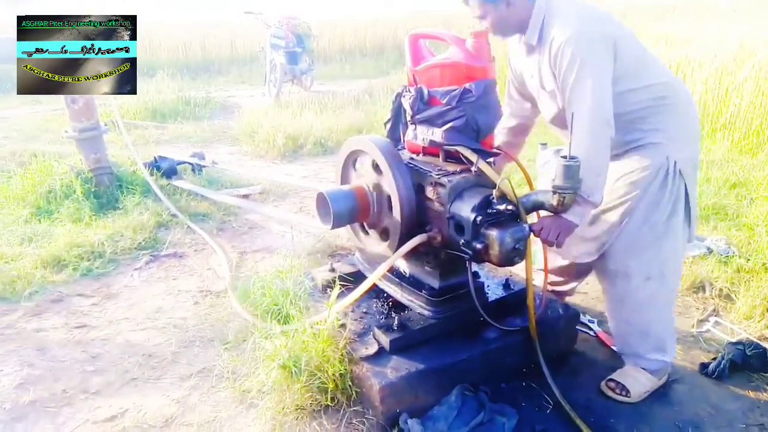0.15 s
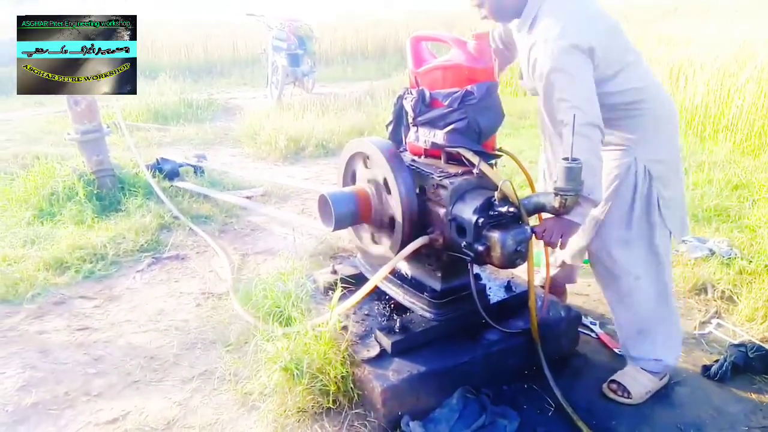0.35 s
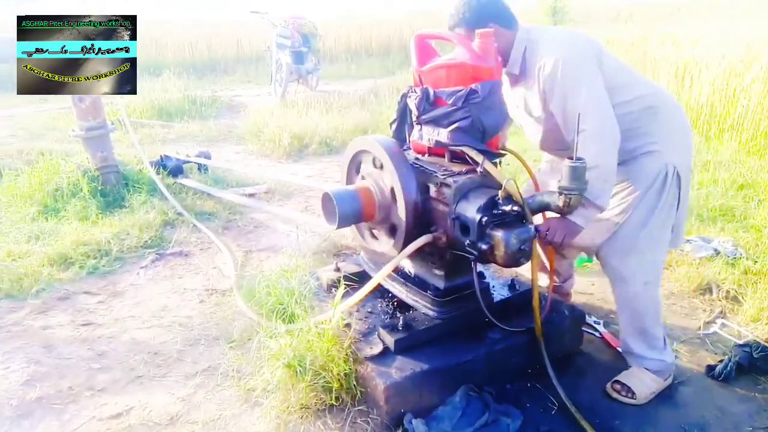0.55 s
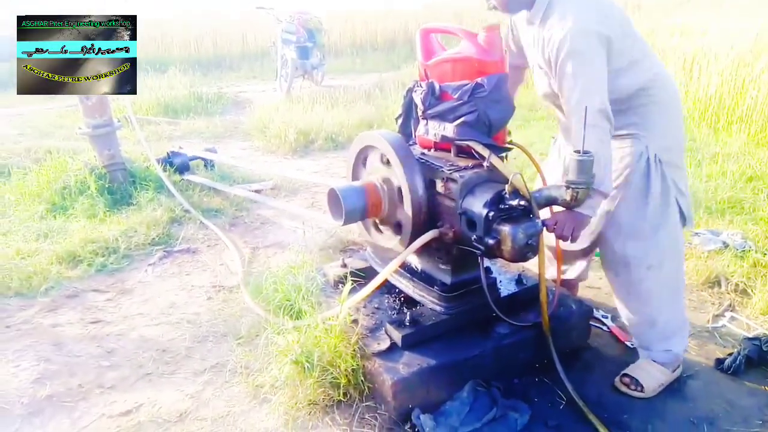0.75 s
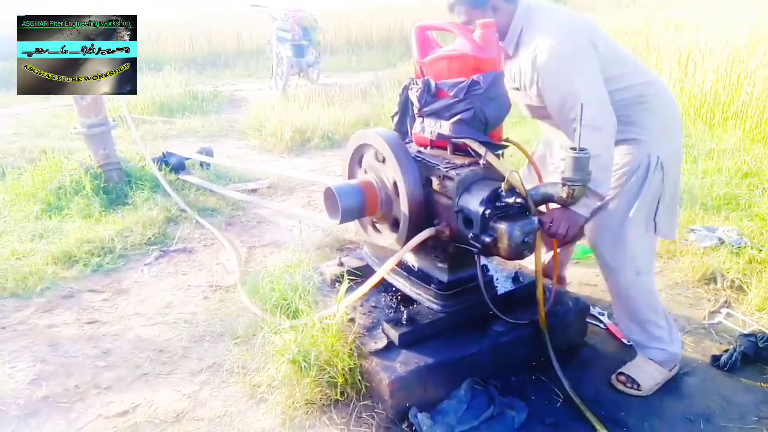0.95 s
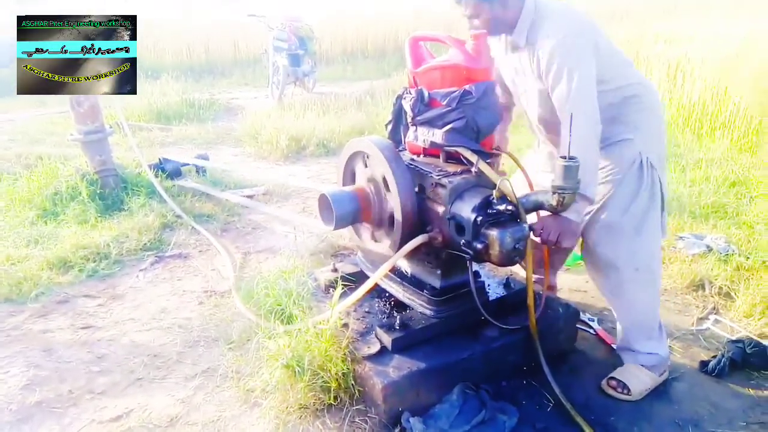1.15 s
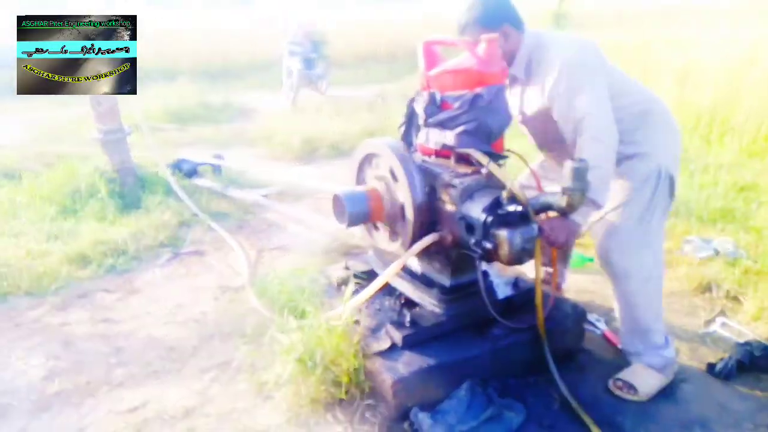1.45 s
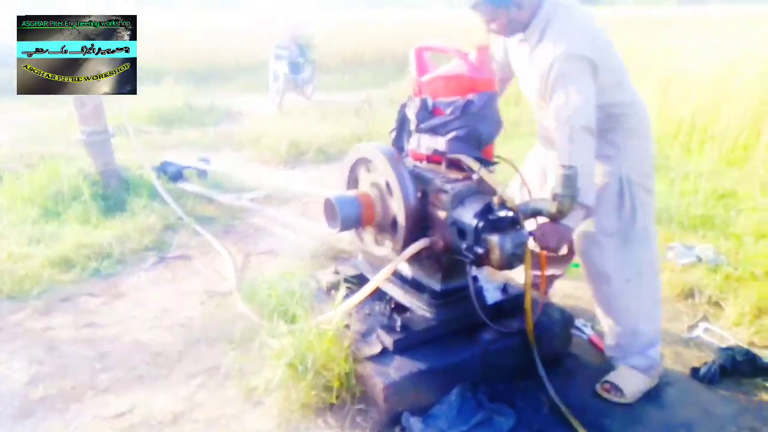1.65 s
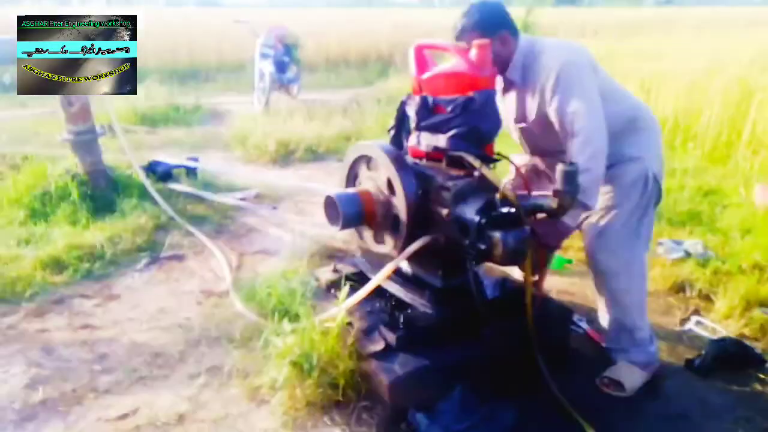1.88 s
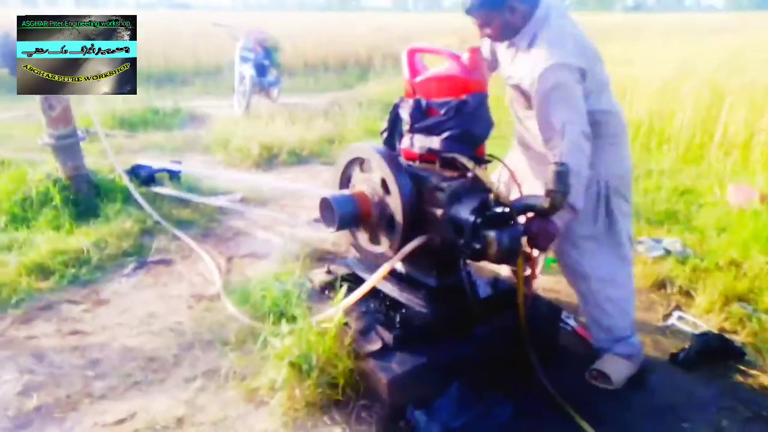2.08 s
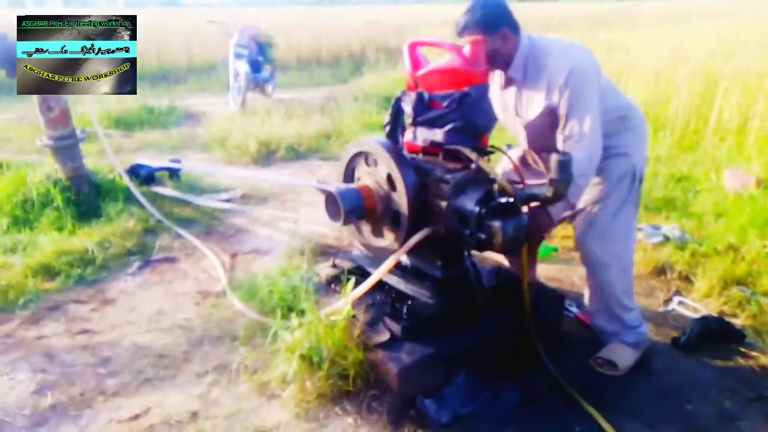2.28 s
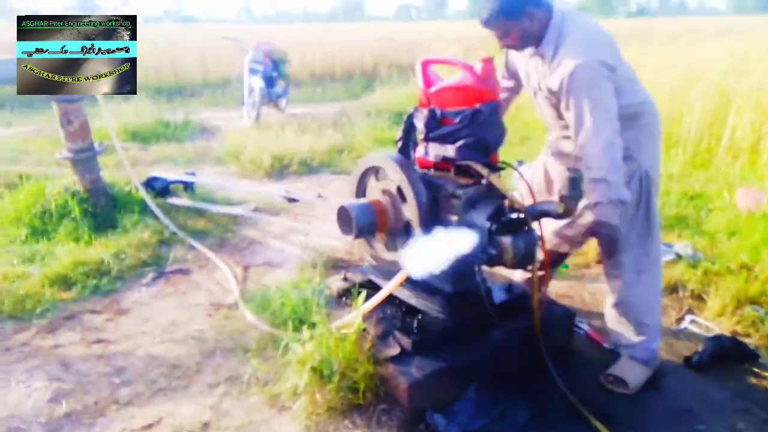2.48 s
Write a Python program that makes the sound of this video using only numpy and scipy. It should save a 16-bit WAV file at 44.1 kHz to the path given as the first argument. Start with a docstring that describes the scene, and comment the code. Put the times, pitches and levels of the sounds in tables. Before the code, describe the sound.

Hand-cranked old diesel engine turns over with gear rumble, breathy puffs, ticks and iron clanks

```python
"""Gear rumble opens the scene: a single-cylinder diesel is hand-cranked outdoors with its valve held open.
Random tooth knocks and sliding noise excite resonances of the cast block and case, beside a wandering hum.
Shaped turbulent noise puffs out of and sucks into the cylinder; a sharp bump and a few soft ones reach the
microphone directly. Tappets tick, the valve rings and linkage clanks as damped modes, and iron scrapes as
grains of friction while the crank stalls. Low outdoor air and a steady floor lie beneath."""
import sys
import numpy as np
from scipy import signal
from scipy.fft import rfft, irfft, next_fast_len
from scipy.io import wavfile
from scipy.ndimage import uniform_filter1d, map_coordinates

SR = 44100
rng = np.random.default_rng(int(sys.argv[2]) if len(sys.argv) > 2 else 0)


def to_wav(s):
    """Save 16-bit WAV."""
    ch = np.atleast_2d(s).T  # columns
    pcm = np.round(np.clip(ch, -1, 1) * 32767)  # PCM
    wavfile.write(sys.argv[1], SR, pcm.astype(np.int16))


N = 116865
T = np.arange(N) / SR  # time [s]


def amp(db):
    """Decibel law: a level in dB becomes an amplitude ratio."""
    return 10 ** (np.asarray(db) / 20)


def unit(x):
    """Power normalization: x is scaled to rms 1."""
    return x / np.sqrt(np.mean(x ** 2) + 1e-20)


def filtered(x, response):
    """Linear filtering: the spectrum of x is multiplied by a complex response of frequency."""
    m = next_fast_len(N + SR // 2)
    return irfft(rfft(x, m) * response(np.fft.rfftfreq(m, 1 / SR)), m)[:N]


def dull(hz):
    """Causal low-pass: four equal first-order poles at hz in cascade."""
    return lambda f: (1 + 1j * f / hz) ** -4


def resonate(x, peaks, top_hz):
    """Modal superposition: parallel (Hz, width Hz, dB) resonances fade above top_hz; the sum has rms 1."""
    def response(f):
        modes = 0
        for k, (centre, width, db) in enumerate(peaks):
            damping = 1j * f * width
            # neighbouring modes alternate in sign
            modes = modes + (-1) ** k * amp(db) * damping / (centre ** 2 - f ** 2 + damping)
        low_cut = (1j * f / (70 + 1j * f)) ** 2
        return dull(top_hz)(f) * low_cut * modes
    return unit(filtered(x, response))


def noise(points):
    """Spectral shaping: white noise is coloured by (Hz, dB) points on a log-frequency axis, to rms 1."""
    hz, db = np.transpose(points)

    def colour(f):
        return amp(np.interp(np.log(f + 1), np.log(hz + 1), db))
    return unit(filtered(rng.standard_normal(N), colour))


def wobble(rate):
    """Slow random modulation: a smooth curve through random knots, rate of them a second."""
    knots = rng.standard_normal(int(N * rate / SR) + 4)
    return map_coordinates(knots, [T * rate])


def patchy(x, depth_db, count=6):
    """Time-frequency modulation: smoothed random gain patches make the noise uneven, at rms 1."""
    z = signal.stft(x, nperseg=256)[2]
    field = uniform_filter1d(rng.standard_normal(z.shape), size=4, axis=0)  # along frequency
    field = uniform_filter1d(field, size=count, axis=1)  # along time
    return unit(signal.istft(z * amp(depth_db * unit(field)), nperseg=256)[1][:N])


def swell(rows):
    """Asymmetric Gaussian envelopes: each flow (peak s, dB, rise s, fall s) grows and dies at its own rate."""
    total = 0
    for s, db, rise, fall in rows:
        width = np.where(T < s, rise, fall)
        total = total + amp(db) * np.exp(-((T - s) / width) ** 2)
    return total


def ring(modes, rise_s, rattle):
    """Impulse response: modes (Hz, dB, t60 s), scattered in level and pitch, decay under a rough gain."""
    scatter_db, detune = 3, 0.023
    t = T[:SR // 4]
    tone = 0
    for hz, db, t60 in modes:
        decay = amp(db + scatter_db * rng.normal() - 60 * t / t60)
        tone = tone + decay * np.sin(2 * np.pi * hz * (1 + detune * rng.normal()) * t)
    jiggle = 1 + rattle * uniform_filter1d(rng.standard_normal(len(t)), size=40) * np.sqrt(40)
    jiggle = uniform_filter1d(jiggle, size=20)
    return tone * jiggle * (1 - np.exp(-t / rise_s))


def add(out, s, x):
    """Superposition: x is mixed into out from time s."""
    part = out[round(s * SR):][:len(x)]
    part += x[:len(part)]


def chatter():
    """Random impact train: chattering loose parts make sudden gain rises that decay exponentially."""
    per_s, t60_s, rise_db = 90, 0.04, 9
    hits = (rng.random(N) < per_s / SR) * amp(1.3 * rng.standard_normal(N))
    t = T[:SR // 8]
    decay = amp(-60 * t / t60_s) * (1 - np.exp(-t / 0.002))
    return unit(1 + amp(rise_db) * signal.fftconvolve(hits, decay)[:N])


def gear_drive():
    """Mixed excitation: sparse tooth knocks of random size and sign over smooth sliding noise."""
    teeth_per_s, tooth_spread_db, smooth_share = 600, 3.0, 1.03
    size = amp(tooth_spread_db * rng.standard_normal(N))
    knocks = (rng.random(N) < teeth_per_s / SR) * size * rng.standard_normal(N)
    return unit(knocks) + smooth_share * rng.standard_normal(N)


def gears():
    """Source-filter principle: tooth knocks and sliding noise excite block and case resonances, with hiss."""
    # gear rumble: (time [s], hum level [dB], clatter level [dB], hiss level [dB])
    rumble = [(0.0, -32, -43.5, -57.5), (0.18, -35, -36, -45), (0.21, -32.5, -40, -69),
              (0.26, -35, -40, -54.5), (1.27, -32.5, -36.5, -55), (1.8, -31, -37, -48.5),
              (1.905, -29.5, -30, -50.5), (1.94, -34.5, -36, -53), (2.39, -31.5, -41, -56.5),
              (2.42, -50, -50.5, -72), (2.55, -33.5, -43.5, -53), (2.65, -44, -44, -64)]
    # low resonances of the block: (frequency [Hz], width [Hz], relative level [dB])
    block = [(104, 67, -18.5), (189.7, 68, -10.5), (257.6, 41.3, -3), (282.4, 9.1, 4.5), (321.7, 51, -11.5)]
    # resonances of the gear case: (frequency [Hz], width [Hz], relative level [dB])
    case = [(635.7, 75, -5), (767.7, 51.3, 0), (839.4, 79, 0), (952, 118, -5), (1265, 302, -10.5),
            (1950, 326, -19)]
    # hiss spectrum: (frequency [Hz], relative density [dB per Hz])
    hiss_spectrum = [(1900, -10), (2300, -17.5), (3100, -8), (3800, -2), (4500, -8), (5200, -25),
                     (6200, -13), (7300, -28), (7800, -47.5), (15800, -49.5)]
    hum_hz, hum_wander_hz, hum_db = 278.1, 9.11, -6.5
    s, *cols = np.transpose(rumble)
    hum_gain, clatter_gain, hiss_gain = [amp(np.interp(T, s, c)) for c in cols]

    tone = np.sin(2 * np.pi * np.cumsum(hum_hz + hum_wander_hz * wobble(17)) / SR)
    tone_gain = amp(hum_db + 4.9 * wobble(6.8))
    hum = unit(resonate(gear_drive(), block, top_hz=1450) + tone_gain * tone)
    clatter = resonate(gear_drive(), case, top_hz=4160)
    hiss = chatter() * patchy(noise(hiss_spectrum), depth_db=4.5, count=14)
    return (hum_gain * amp(1.1 * wobble(24.94)) * hum
            + clatter_gain * amp(0.74 * wobble(30.56)) * clatter
            + hiss_gain * amp(1.1 * wobble(25.67)) * hiss)


def outdoor_air():
    """Low-frequency random pressure: coloured noise with a fluctuating level."""
    # low outdoor air: (frequency [Hz], relative density [dB per Hz])
    low_air = [(25, -42.5), (60, -10), (90, 5.5), (170, -1.5), (300, -29), (500, -94)]
    return amp(-49.5 + 3.7 * wobble(21.0)) * noise(low_air)


def outdoor_floor():
    """Stationary random process: coloured noise at a constant level."""
    # steady outdoor floor: (frequency [Hz], relative density [dB per Hz])
    floor = [(1500, -2.5), (2300, -23), (3800, -8), (6500, -18.5), (8000, -34), (15800, -45)]
    return amp(-59.5) * noise(floor)


def air():
    """Flow turbulence: noise excites the valve port's resonances going out and hisses going in."""
    # strokes out through the valve: (peak time [s], level [dB], rise [s], fall [s])
    puffs = [(.158, -32, 0.029, 0.011), (.635, -31, 0.031, 0.015), (1.075, -26, 0.026, 0.014),
             (1.49, -24, 0.024, 0.013), (2.585, -43.5, 0.014, 0.021)]
    # strokes back in: (peak time [s], level [dB], rise [s], fall [s])
    sucks = [(.27, -52, 0.058, 0.048), (.73, -48.5, 0.053, 0.04), (1.16, -48, 0.054, 0.046),
             (1.57, -45.5, 0.065, 0.044), (2.145, -52, 0.024, 0.0055)]
    # port resonances: (frequency [Hz], width [Hz], relative level [dB])
    port = [(590, 58, 1.5), (892, 103, 7.5), (1305, 67, 5.5), (1696, 67, -2), (2524, 55, -2),
            (3056, 49, -1), (3812, 16, 15), (4160, 140, 2), (6470, 77, -3)]
    # outgoing hiss: (frequency [Hz], relative density [dB per Hz])
    puff_air = [(400, -33.5), (900, -6.5), (2240, -18.5), (3700, -4.5), (4800, -15.5), (7300, -24.5),
                (8200, -32.5), (13000, -41.5), (14000, -58.5), (15800, -53)]
    # incoming hiss: (frequency [Hz], relative density [dB per Hz])
    suck_air = [(1500, -36), (2450, -8), (3750, -2.5), (4900, -10.5), (5800, -11.5), (7200, -18.5),
                (10500, -35), (11500, -39), (15800, -53)]
    port_db, air_db = 1, -5.5
    spit_s, spit_half_s, spit_db = 2.034, 0.0069, -60.5  # one bright spit of air

    whistle = resonate(rng.standard_normal(N), port, top_hz=10000)
    outflow = amp(port_db) * whistle + amp(air_db) * noise(puff_air)
    inflow = patchy(noise(suck_air), depth_db=2.5)
    spit_gain = amp(spit_db) * np.exp(-((T - spit_s) / spit_half_s) ** 2)
    spit = spit_gain * noise([(5000, -26), (8000, -1), (15800, -7)])
    return (swell(puffs) * amp(1.1 * wobble(150)) * outflow
            + swell(sucks) * amp(1.4 * wobble(87)) * inflow + spit)


def bumps():
    """Damped oscillation: a sharp bump whose swing slows as it dies, a faint crack, and soft low thuds."""
    # soft bumps: (time [s], level [dB], frequency [Hz], t60 [s])
    soft = [(0.3, -18, 90, 0.054), (0.32, -10, 109, 0.037), (1.891, -34.5, 98, 0.22),
            (2.042, -18.5, 122, 0.118), (2.586, -28.5, 90, 0.36)]
    bump_s, bump_db, first_half_s, stretch = .2131, -1.2, .00135, 1.9
    decay_s, fade_power, top_hz = .0085, .7, 3700
    crack_db, crack_t60_s = -34, .008

    t = np.clip(T - bump_s, 0, None)
    swing = np.sin(np.pi * (t / first_half_s) ** (1 / stretch))  # half-swings grow longer
    out = -amp(bump_db) * swing * np.exp(-(t / decay_s) ** fade_power)
    t = T[:SR // 2]
    for s, db, hz, t60 in soft:
        decay = amp(db - 60 * t / t60) * (1 - np.exp(-t / 0.0033))
        add(out, s, -decay * np.sin(2 * np.pi * hz * t))
    crack_gain = amp(crack_db - 60 * np.abs(T - bump_s) / crack_t60_s) * (T > bump_s)
    crack = crack_gain * noise([(500, -11), (4000, -6.0), (8000, -21.0), (15800, -32)])
    return filtered(out, dull(top_hz)) + crack


def ticks():
    """Impact radiation: closing tappets excite short steel modes and a decaying noisy rattle."""
    # tappet ticks: (time [s], relative level [dB], relative level of the bright part [dB])
    tick_events = [(0.3334, -22.5, -31), (0.345, -33, -27), (0.378, -36, -33), (0.4315, -27.5, -14.5),
                   (0.4726, -31, -22), (0.562, -35, -20), (0.68, -26, -22), (0.811, -31, -20),
                   (0.8863, -27, -16), (0.931, -35, -30), (1.0091, -35, -14), (1.118, -26, -29),
                   (1.2352, -31, -16), (1.3077, -27.5, -13), (1.357, -33, -18.5), (1.37, -30, -22.5),
                   (1.526, -23.5, -37), (1.571, -30, -31), (1.6408, -29.5, -14), (1.711, -28.5, -14.5),
                   (1.7332, -19.5, -26), (1.8494, -28.5, -54), (1.899, -24.5, -46), (1.929, -35, -45),
                   (1.9735, -30.5, -19), (2.0289, -27, -11.5), (2.144, -34, -12), (2.178, -31, -26),
                   (2.2891, -28.5, -26), (2.3442, -31.5, -51), (2.388, -27.5, -22), (2.4447, -38, -22),
                   (2.4903, -40, -44), (2.5778, -36, -14)]
    # lower steel modes: (nominal frequency [Hz], mean relative level [dB], t60 [s])
    steel = [(2355, 2, 0.018), (3080, -3, 0.019), (3784, 5, 0.024), (4462, 2.5, 0.027), (5110, -10, 0.05)]
    # bright steel mode: (nominal frequency [Hz], mean relative level [dB], t60 [s])
    steel_high = [(7550, -3.5, 0.031)]
    # lower rattle: (frequency [Hz], relative density [dB per Hz])
    grit_spectrum = [(1500, -20), (2300, -13), (3700, 0), (5200, -9.5), (9000, -67.5)]
    # bright rattle: (frequency [Hz], relative density [dB per Hz])
    fizz_spectrum = [(4500, -33), (6000, -1), (7300, 3), (8000, -16.5), (12500, -28), (15800, -58.5)]
    rattle_t60_s, rattle_db, tick_db = 0.047, 2, -10.5

    out, t = np.zeros(N), T[:SR // 4]
    grit, fizz = noise(grit_spectrum), noise(fizz_spectrum)
    shape = amp(rattle_db - 60 * t / rattle_t60_s) * (1 - np.exp(-t / 0.0015))
    for s, db, bright_db in tick_events:
        k = rng.integers(N - len(t))  # a random stretch of the noise
        low = ring(steel, rise_s=0.0046, rattle=0.52) + shape * grit[k:k + len(t)]
        high = ring(steel_high, rise_s=0.0024, rattle=0.32) + amp(2.0) * shape * fizz[k:k + len(t)]
        add(out, s, amp(db + tick_db) * (low + amp(bright_db + 4.0) * high))
    return out


def notes():
    """Free vibration: the valve seats after a puff with a clear note and a weak, shorter octave."""
    # seating notes: (time [s], mean level [dB], nominal pitch [Hz])
    note_events = [(0.676, -20.5, 982), (1.114, -20, 952), (1.524, -17.5, 1000)]
    t60_s, rise_s, octave_db = 0.1, .003, -16
    out = np.zeros(N)
    for s, db, hz in note_events:
        modes = [(hz, db, t60_s), (2 * hz, db + octave_db, t60_s / 2)]
        add(out, s, ring(modes, rise_s, rattle=0.37))
    return out


def clanks():
    """Inharmonic modal impact: loose iron linkage knocks with a noisy crack and rings briefly."""
    # linkage clanks: (time [s], relative level [dB], reference pitch [Hz])
    clank_events = [(0.949, -22, 852), (1.372, -17.5, 844), (1.421, -24.5, 830), (1.549, -17, 810),
                    (1.624, -26.5, 840), (1.776, -21, 813), (1.818, -22.5, 808), (1.929, -21.5, 958),
                    (1.968, -25.5, 793), (2.269, -26.5, 764), (2.345, -21, 1007), (2.382, -21.5, 1297),
                    (2.4465, -25, 1840), (2.587, -25, 787)]
    # iron modes: (ratio to reference pitch, mean relative level [dB], 60 dB decay [reference cycles])
    iron = [(0.781, -10.5, 57), (0.933, -3.5, 73.5), (0.997, -1, 73.5), (1.401, -13, 70)]
    clank_db, rise_s = -3.5, 0.00084
    knock_db, knock_t60_s = -6, 0.069

    out, t = np.zeros(N), T[:SR // 4]
    grit = noise([(400, -22.5), (900, 7.5), (2000, -1.0), (4500, -29.0), (6000, -40.0)])
    crack_shape = amp(knock_db - 60 * t / knock_t60_s) * (1 - np.exp(-t / 0.0017))
    for s, db, hz in clank_events:
        k = rng.integers(N - len(t))
        crack = crack_shape * grit[k:k + len(t)]
        modes = [(hz * ratio, d, cycles / hz) for ratio, d, cycles in iron]
        add(out, s, amp(db + clank_db) * (ring(modes, rise_s, rattle=0.34) + crack))
    return filtered(out, dull(hz=5000))


def scrapes():
    """Friction excitation: dense uneven grains of rubbing iron drive broad resonances as the crank stalls."""
    # scrapes: (peak time [s], level [dB], rise [s], fall [s])
    scrape_events = [(2.348, -34.5, 0.015, 0.042), (2.495, -35, 0.0069, 0.0073)]
    grains_per_s = 5000
    grains = (rng.random(N) < grains_per_s / SR) * rng.standard_normal(N)
    peaks = [(754, 167, 3.5), (1380, 680, -4.5), (3670, 740, -14.5)]
    return swell(scrape_events) * resonate(grains, peaks, top_hz=9000)


def brief_dips():
    """Amplitude modulation: the level dips briefly, with smoothed edges."""
    # dips: (start [s], end [s], level change [dB])
    dips = [(0.184, 0.227, -13.5)]
    dip_db = sum(db * ((T > a) & (T < b)) for a, b, db in dips)
    return amp(uniform_filter1d(dip_db * 1., size=300))


def scene():
    """Linear superposition: the dipping, high-passed engine and low air join the floor and the blows."""
    steady = brief_dips() * (gears() + air() + outdoor_air())
    steady = filtered(steady, lambda f: (1j * f / (45 + 1j * f)) ** 4)
    blows = bumps() + ticks() + notes() + clanks()
    return (steady + outdoor_floor() + blows + scrapes())[None]


def record(dry):
    """Band limitation: nothing is kept at or above 15830 Hz."""
    return filtered(dry[0], lambda hz: hz < 15830)[None]


dry = scene()
out = record(dry)
to_wav(out)
```